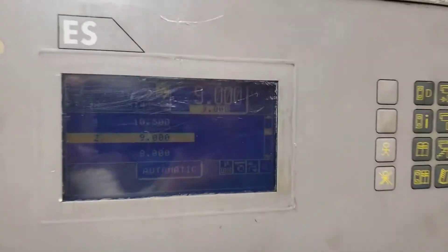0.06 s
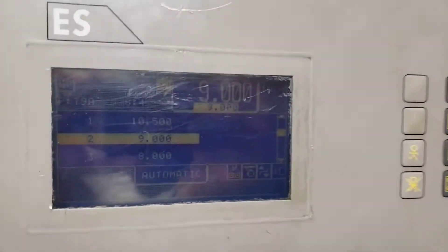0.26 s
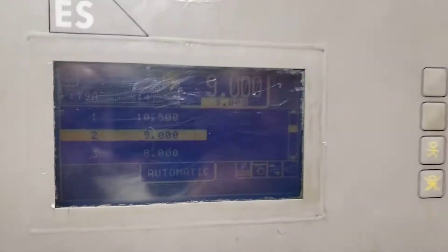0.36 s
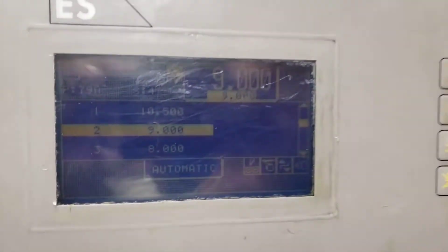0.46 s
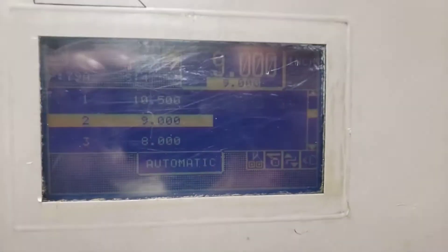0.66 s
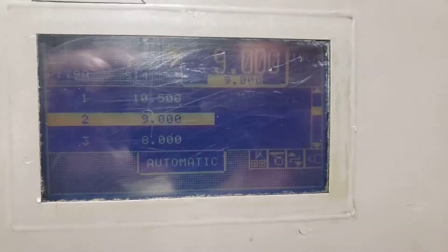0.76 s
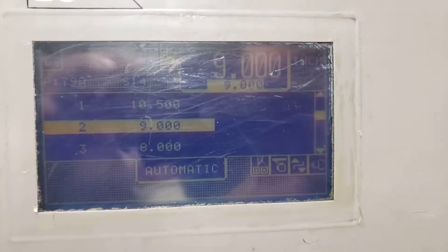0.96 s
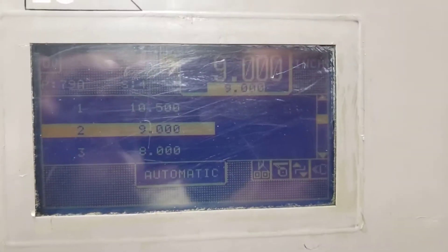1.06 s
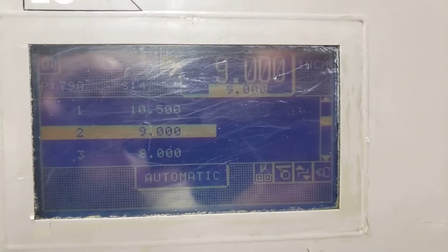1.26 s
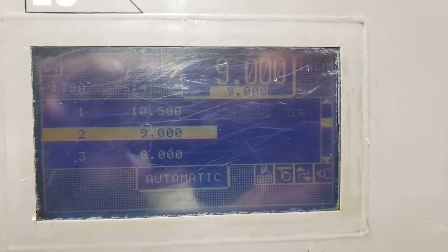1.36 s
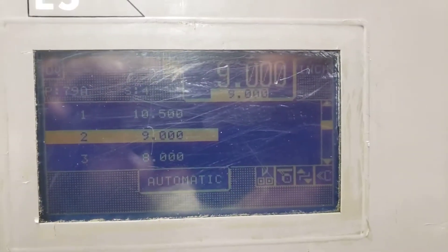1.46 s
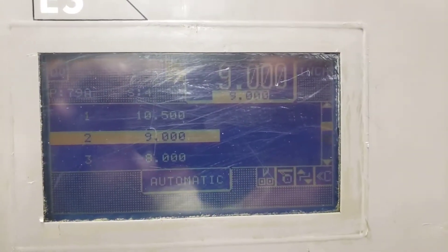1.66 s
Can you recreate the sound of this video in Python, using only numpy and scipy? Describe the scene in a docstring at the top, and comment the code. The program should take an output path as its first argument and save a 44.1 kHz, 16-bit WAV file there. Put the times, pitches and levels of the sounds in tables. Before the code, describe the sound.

An industrial cutting machine, heard close, clunks heavily twice, at about 0.25 and 0.4 seconds, rattling its steel covers over a pump's hum. Hydraulic hiss and a faint whine fade by 0.7 seconds. A small catch clicks at 0.8, and a latch drops with a double clack around 1.25. From 1.4 the pump hums again, slightly higher. Low workshop machinery noise continues behind, with a short room echo.

```python
"""Paper guillotine in a workshop

A stereo pair close to the control panel, the treble leaning left. The hydraulic pump hums under load;
two heavy clunks shake the frame and rattle the steel covers, and oil hisses through a valve.
A small catch clicks, a latch drops home with a double clack, and the pump hums on, unloaded and
a little higher. Behind it are the shop's machinery and a short room tail."""
import sys
import numpy as np
from scipy import signal
from scipy.fft import rfft, irfft
from scipy.io import wavfile

SR = 44100
rng = np.random.default_rng(int(sys.argv[2]) if len(sys.argv) > 2 else 0)


def write(x):
    x = np.atleast_2d(x).T
    wavfile.write(sys.argv[1], SR, np.round(np.clip(x, -1, 1) * 32767).astype(np.int16))


N = 74970
T = np.arange(N) / SR
EDGES_HZ = np.geomspace(25, 17000, 27)
BANDS_HZ = np.sqrt(EDGES_HZ[1:] * EDGES_HZ[:-1])

# blows of the mechanism: start_s, frame_thud_db, cover_clank_db
BLOWS = [(0.2459, -12.5, -15), (0.2602, -19.5, -19.5), (.2765, -37, -16.5), (0.293, -18, -18),
         (.304, -21, -19), (.331, -19.5, -20.5), (.347, -29, -33), (.4000, -16, -11.5),
         (0.4104, -10.5, -17), (.423, -21.5, -21.5), (0.434, -16, -36), (.492, -28.5, -39),
         (.765, -31.5, -41.5)]
# steel snapping against steel: start_s, level_db, tilt_db_per_octave
CRACKS = [(0.2605, -20.5, 1.5), (.2738, -31, 1), (0.2761, -21, -1), (.4104, -24, -5), (0.437, -32.5, -5)]
# jolts that shake the whole machine: start_s, level_db
JOLTS = [(.249, -12), (.412, -17.5)]
# modes of the base, frame, covers and bare steel: pitch_hz, level_db, t60_s
BASE_MODES = [(62, -5, 0.42), (73, -2, 0.26)]
FRAME_MODES = [(116.5, -15.5, 0.14), (142, -9.5, 0.11), (182.3, 1.5, 0.091), (229, 3.5, 0.17),
               (272.4, -9.5, 0.14), (325, -12.5, 0.19), (381.7, -17.5, 0.27), (449.7, -12, 0.27),
               (518, -12, 0.12)]
COVER_MODES = [(634.5, -9, 0.33), (876, -15, 0.18), (1011, -14, 0.084), (1129, -25, 0.14)]
STEEL_MODES = [(4743, 10, 0.021), (5645, 5.5, 0.019)]
# dense ring of the covers and of bare steel: frequency_hz, density_db
COVER_SPECTRUM = [(33, -43), (66, -2.5), (150, 0), (300, -3), (650, -2.5), (1100, -8.5), (2000, -17),
                  (4000, -24), (9000, -39)]
STEEL_SPECTRUM = [(300, -28), (1200, 0.5), (3200, -3), (5500, 1.5), (7200, -4.5), (10000, -12),
                  (15000, -5.5)]
COVER_T60_S, STEEL_T60_S, CRACK_T60_S, ATTACK_S = 0.19, 0.095, 0.015, 0.0022

# contacts of the latch: start_s, level_db, tilt_db_per_octave, t60_s, housing_knock_db
LATCH_HITS = [(1.198, -34, -3.5, 0.25, -56), (1.2156, -25.5, -2.7, 0.075, -25),
              (1.2629, -18, 0, 0.21, -30.5), (1.286, -26, -5.5, 0.14, -24)]
# its lever, struck by the second clunk and by the closing snap: start_s, level_db
LEVER_KNOCKS = [(.3992, 1), (1.2629, -1.5)]
# modes of its housing and lever: pitch_hz, level_db, t60_s
HOUSING_MODES = [(217.7, -0.5, .15), (413, -11, 0.27), (743, 1.5, 0.066), (1324, -6, 0.07)]
LEVER_MODES = [(642, 0, 0.038), (1181, -20, 0.051), (1310, -26.5, .17), (1468, -20.5, 0.14),
               (2560, -28, 0.11)]
# dense ring of the latch and of the small catch: frequency_hz, density_db
LATCH_SPECTRUM = [(45, -27), (170, -10), (450, -9), (750, -2), (1000, -9.5), (1400, -0.5), (1800, -10.5),
                  (2700, -8.5), (6500, -12), (10500, -23.5), (15000, -19.5)]
CATCH_SPECTRUM = [(300, 1.5), (1700, -0.5), (2150, -2), (2600, 0), (4200, -11.5), (9000, -20)]
CATCH_S, CATCH_DB, CATCH_T60_S = .828, -30.5, 0.14

# the pump loaded, then unloaded: start_s, end_s, pitch_hz, level_db, overtone_loss_db_per_octave
PUMP_RUNS = [(-.1, 0.317, 263.9, -39, 2), (1.422, 1.8, 277, -41, 6)]
# its harmonics: multiple, level_db
PUMP_HARMONICS = [(1, -1.5), (2, -7.5), (3, -11.5), (4, -11), (5, -8.5)]
PUMP_FADE_S, PITCH_WOBBLE = 0.027, .003
# steady hum of the motor: pitch_hz, level_db
MOTOR_HUM = [(119, -54)]
# whine of the hydraulics under pressure: pitch_hz, level_db
WHINE_TONES = [(3451, -50), (3535, -54.5), (3704, -51.5), (6885, -58)]
WHINE_END_S, WHINE_FADE_S = 0.7, 0.44
# narrow resonances of the running machine: pitch_hz, width_hz, level_db
RESONANCES = [(245, 27, -52), (512, 39, -60.5), (1088, 9, -60)]
SQUEAK_HZ, SQUEAK_WIDTH_HZ, SQUEAK_DB = 6980, 340, -55.5
SQUEAKS_PER_S, SQUEAK_PEAK_S = 19.4, 1.535
# loudness of the oil valve and of the shop's machinery: time_s, level_db
VALVE_LEVEL = [(0, -45), (0.242, -44.5), (.3, -36.5), (.39, -40.5), (.46, -35), (0.612, -42.5),
               (.68, -53.5), (.77, -43.5), (0.838, -46.5), (.88, -55.5), (1.2, -54.5)]
SHOP_LEVEL = [(0, -33.5), (.24, -35.5), (.65, -41), (1.58, -42.5), (1.7, -39.5)]
# colour of the same two noises: frequency_hz, density_db
VALVE_SPECTRUM = [(1000, -11), (2500, 3), (7300, 2), (10000, -7.5), (12500, -3), (15000, 4)]
SHOP_SPECTRUM = [(33, -37), (62, 0.5), (88, -7.5), (125, -2), (170, -7), (230, -5.5), (330, -11),
                 (530, -11.5), (850, -19), (3300, -22.5), (7000, -28.5), (8500, -83), (10500, -46),
                 (15500, -42)]

# decay of the workshop: frequency_hz, t60_s
ROOM_T60 = [(60, 0.96), (200, 0.74), (2000, 0.54), (12000, 0.24)]
RING_ROOM_DB, FRAME_ROOM_DB, HOUSING_ROOM_DB, ROOM_BUILD_S = -11.5, -12, -13.5, 0.009
# echoes off hard surfaces close by: left_delay_s, right_delay_s, level_db
REFLECTIONS = [(.0011, .0016, -14), (.0027, .0021, -13), (.0043, .0052, -11)]
# image at the microphones: frequency_hz, left_right_correlation, left_minus_right_db
STEREO_IMAGE = [(60, 0.96, -0.5), (180, 0.93, 1.5), (417, 0.8, 3), (800, 0.079, 7.5), (4080, 0, 6.5),
                (9300, 0.13, 20.5), (14800, 0, 9)]
REFLECT_ABOVE_HZ, LOW_CUT_HZ, HIGH_CUT_HZ = 1500, 28, 16000


def clunks():
    """Blows thud in the frame and clank in the loose covers; steel cracks on steel, the base booms."""
    frame = modal_ring([(s, db) for s, db, _ in BLOWS], FRAME_MODES, scatter_db=2)
    frame += modal_ring(JOLTS, BASE_MODES, scatter_db=1)
    covers = dense_ring([(s, db, 0, COVER_T60_S) for s, _, db in BLOWS], COVER_SPECTRUM, crack_db=-1)
    steel = dense_ring([(*crack, STEEL_T60_S) for crack in CRACKS], STEEL_SPECTRUM, crack_db=13.5)
    steel += modal_ring([(s, db) for s, db, _ in CRACKS], STEEL_MODES, scatter_db=1)
    steel *= from_db([[-4], [-1.5]])   # left, right
    covers += modal_ring([(s, db) for s, _, db in BLOWS], COVER_MODES, scatter_db=2)
    rattle = from_db(1.16 * drift(190))
    return frame + from_db(FRAME_ROOM_DB) * room_tail(frame) + rattle * (covers + steel)


def latch():
    """The latch slides, knocks on its housing, snaps home and settles; its lever rings when hit hard."""
    housing = modal_ring([(s, db) for s, *_, db in LATCH_HITS], HOUSING_MODES, scatter_db=0.5)
    lever = modal_ring(LEVER_KNOCKS, LEVER_MODES, scatter_db=1.5, attack_s=.008)
    clacks = dense_ring([hit[:4] for hit in LATCH_HITS], LATCH_SPECTRUM, crack_db=-2)
    return clacks + housing + lever + from_db(HOUSING_ROOM_DB) * room_tail(housing)


def catch():
    """A small steel catch gives a light, bright click between the clunks and the latch."""
    return dense_ring([(CATCH_S, CATCH_DB, 0, CATCH_T60_S)], CATCH_SPECTRUM, crack_db=4.5)


def pump():
    """The pump's pulsing gives a slightly unsteady tone, rich under load, over the motor's hum."""
    hum = sum(from_db(db) * sine(hz * T + rng.random()) for hz, db in MOTOR_HUM)
    for start, end, hz, db, loss_db in PUMP_RUNS:
        gate = np.clip(np.minimum(T - start, end - T) / PUMP_FADE_S, 0, 1)
        cycles = wavering_cycles(hz, rate_hz=28.8)
        for multiple, harmonic_db in PUMP_HARMONICS:
            level = from_db(db + harmonic_db - loss_db * np.log2(multiple) + 0.87 * drift(8.9))
            hum = hum + pan(multiple * hz) * gate * level * sine(multiple * cycles + rng.random())
    return hum


def whine():
    """The hydraulics give wavering high tones that fade as the pressure drops."""
    pressure = np.clip((WHINE_END_S - T) / WHINE_FADE_S, 0, 1)
    tones = 0
    for hz, db in WHINE_TONES:
        level = from_db(db + 2 * drift(27))
        tones += pan(hz) * level * sine(wavering_cycles(hz, rate_hz=40))
    return pressure * tones


def valve():
    """Oil hisses through the valve, hardest around the clunks."""
    return shaped_noise(VALVE_SPECTRUM, VALVE_LEVEL)


def squeak():
    """A faint squeak pulses as something turns."""
    pulses = ((1 + np.cos(2 * np.pi * SQUEAKS_PER_S * (T - SQUEAK_PEAK_S))) / 2) ** 2
    return from_db(SQUEAK_DB) * pulses * narrow_noise(SQUEAK_HZ, SQUEAK_WIDTH_HZ)


def singing():
    """Running noise sings in the machine's narrow resonances."""
    return sum(from_db(db + 2 * drift(5.4)) * narrow_noise(hz, width) for hz, width, db in RESONANCES)


def shop():
    """Room tone: the low noise of machinery in the shop."""
    return shaped_noise(SHOP_SPECTRUM, SHOP_LEVEL)


def reflected(sound):
    """Early reflections comb the treble, differently at each microphone."""
    hz = np.fft.rfftfreq(2 * N, 1 / SR)
    treble = 1j * hz / (1j * hz + REFLECT_ABOVE_HZ)
    echoes = np.array([from_db(db) * treble * np.exp(-2j * np.pi * hz * np.array([[left], [right]]))
                       for left, right, db in REFLECTIONS])
    comb = (1 + echoes.sum(axis=0)) / np.sqrt(1 + np.sum(np.abs(echoes) ** 2, axis=0))
    return irfft(rfft(sound, 2 * N) * comb)[:, :N]


def room_tail(sound):
    """Diffuse reverberation of the workshop."""
    response = sum(band * np.sqrt(width) * room_decay(hz)
                   for band, hz, width in zip(noise_bands(), BANDS_HZ, np.diff(EDGES_HZ)))
    response /= np.sqrt(np.sum(response ** 2) / 2)
    return signal.fftconvolve(sound.mean(axis=0)[None], response, axes=1)[:, :N]


def room_decay(hz):
    """Envelope of the room's tail, longest in the bass."""
    return decay(0, at_hz(ROOM_T60, hz), ROOM_BUILD_S)


def dense_ring(hits, spectrum, crack_db):
    """Countless plate modes as dying noise: a short crack, the ring, the room's tail."""
    direct_power, impulses = 0, np.zeros((len(BANDS_HZ), N))
    for start, db, tilt, t60 in hits:
        power = (from_db(db) * band_gains(spectrum, tilt)) ** 2
        crack = from_db(crack_db) * decay(start, CRACK_T60_S, ATTACK_S / 10)
        direct_power += np.outer(power, decay(start, t60, ATTACK_S) ** 2 + crack ** 2)
        impulses[:, int(start * SR)] += power
    tails = [signal.fftconvolve(row, room_decay(hz) ** 2)[:N] for row, hz in zip(impulses, BANDS_HZ)]
    envelopes = np.sqrt(direct_power + from_db(RING_ROOM_DB) ** 2 * np.abs(tails))
    return np.einsum("bn,bcn->cn", envelopes, noise_bands())


def modal_ring(hits, modes, scatter_db, attack_s=ATTACK_S):
    """Each hit rings every mode with a strength of its own; neighbouring modes swing in opposition."""
    ring = 0
    for k, (hz, mode_db, t60) in enumerate(modes):
        for start, db in hits:
            strength = from_db(db + mode_db + scatter_db * rng.standard_normal())
            swing = (-1) ** k * np.sin(2 * np.pi * hz * (T - start))
            ring += pan(hz) * strength * decay(start, t60, attack_s) * swing
    return ring


def shaped_noise(spectrum, levels):
    """Noise of a given colour that follows a level curve."""
    gain = from_db(np.interp(T, *np.transpose(levels)))
    return gain * np.tensordot(band_gains(spectrum), noise_bands(), axes=1)


def narrow_noise(hz, width_hz):
    """Stereo noise in one resonance, rms 1."""
    tone = signal.lfilter(*signal.iirpeak(hz, hz / width_hz, fs=SR), rng.standard_normal((2, N)))
    return pan(hz) * tone / tone.std()


def noise_bands():
    """Bands of noise as the pair hears them, each of rms 1: bands x 2 x N."""
    white, bands = rng.standard_normal((2, 2, N + SR // 4)), []
    for k, hz in enumerate(BANDS_HZ):
        bandpass = signal.butter(2, EDGES_HZ[k:k + 2], "band", fs=SR, output="sos")
        noise = signal.sosfilt(bandpass, white[k % 2])[:, -N:]
        mid, side = noise / noise.std()
        alike = at_hz(STEREO_IMAGE, hz)
        pair = np.sqrt((1 + alike) / 2) * mid + np.sqrt((1 - alike) / 2) * side * [[1], [-1]]
        bands.append(pan(hz) * pair)
    return np.array(bands)


def band_gains(spectrum, tilt_db=0):
    """Share of each band in a sound of rms 1."""
    density = from_db(at_hz(spectrum, BANDS_HZ) + tilt_db * np.log2(BANDS_HZ))
    gains = density * np.sqrt(np.diff(EDGES_HZ))
    return gains / np.linalg.norm(gains)


def decay(start_s, t60_s, attack_s):
    """Envelope of a blow: a quick rise, an exponential fall."""
    age = np.maximum(T - start_s, 0)
    return (1 - np.exp(-age / attack_s)) * from_db(-np.minimum(60 * age / t60_s, 200))


def wavering_cycles(hz, rate_hz):
    """Running cycle count of a slightly unsteady pitch."""
    return np.cumsum(hz * (1 + PITCH_WOBBLE * drift(rate_hz))) / SR


def sine(cycles):
    """A sine of rms 1."""
    return np.sqrt(2) * np.sin(2 * np.pi * cycles)


def drift(rate_hz):
    """Smooth random wander of spread 1."""
    rolloff = 1 + (np.fft.rfftfreq(N, 1 / SR) / rate_hz) ** 2
    slow = irfft(rfft(rng.standard_normal(N)) / rolloff, N)
    return slow / slow.std()


def pan(hz):
    """Left and right gains: the treble favours the left microphone."""
    gains = from_db(at_hz(STEREO_IMAGE, hz, column=2) * np.array([[.5], [-.5]]))
    return gains / np.sqrt(np.mean(gains ** 2))


def at_hz(table, hz, column=1):
    """Read a column of a table on a log-frequency axis."""
    table = np.array(table)
    return np.interp(np.log(hz), np.log(table[:, 0]), table[:, column])


def from_db(db):
    """Decibels to gain."""
    return 10 ** (np.asarray(db) / 20)


def scene():
    """The machine up close, over the noise of the shop."""
    running = pump() + whine() + squeak() + singing()
    return running + reflected(clunks() + catch() + latch() + valve() + shop())


def record(dry):
    """The microphones lose the deepest rumble, the highest peaks are rounded and the top is cut."""
    lean = signal.sosfilt(signal.butter(2, LOW_CUT_HZ, "high", fs=SR, output="sos"), dry)
    rounded = lean / (1 + lean ** 6) ** (1 / 6)
    return signal.sosfilt(signal.ellip(12, .1, 80, HIGH_CUT_HZ, fs=SR, output="sos"), rounded)


dry = scene()
out = record(dry)
write(out)
```